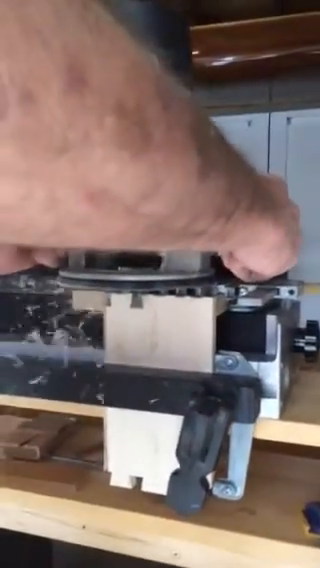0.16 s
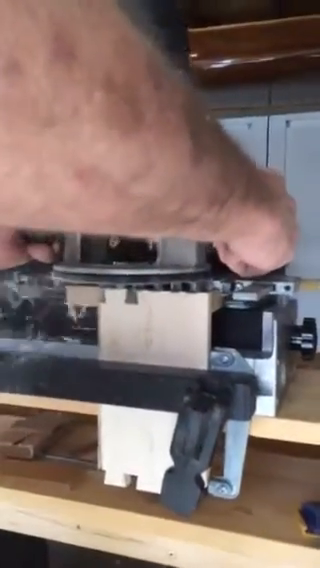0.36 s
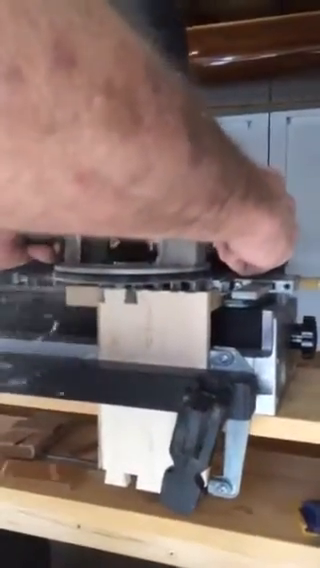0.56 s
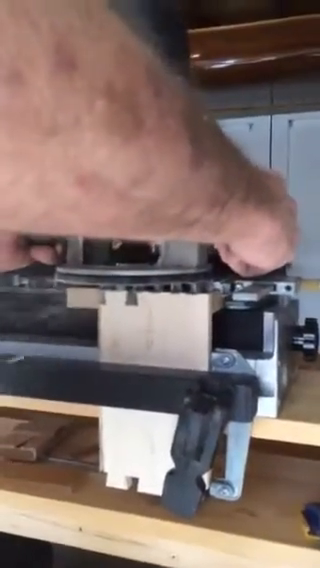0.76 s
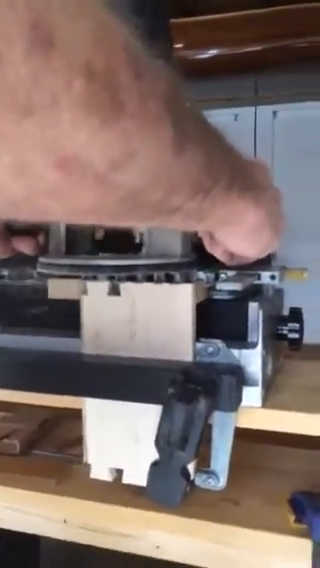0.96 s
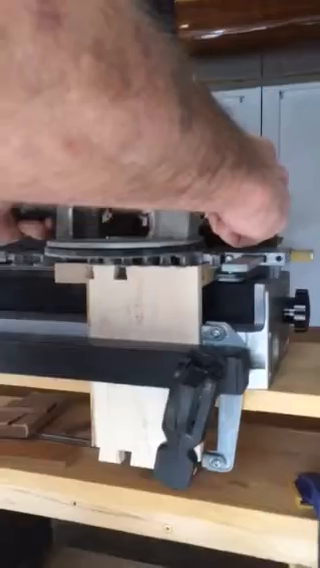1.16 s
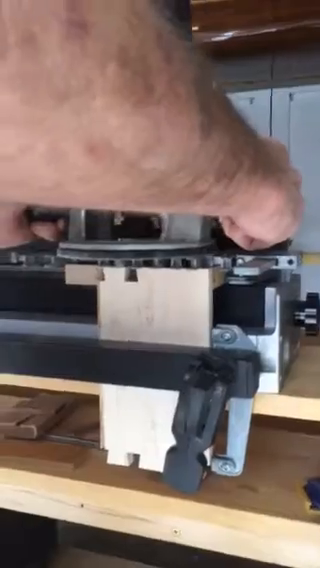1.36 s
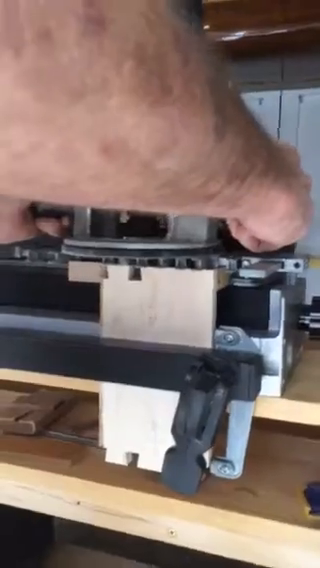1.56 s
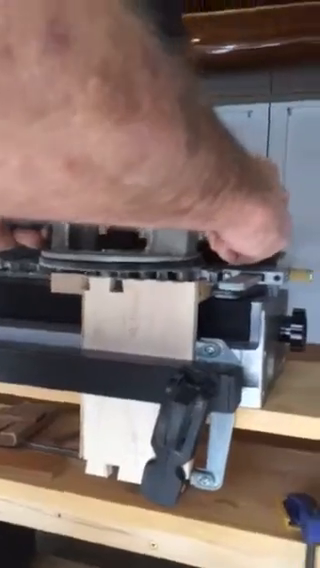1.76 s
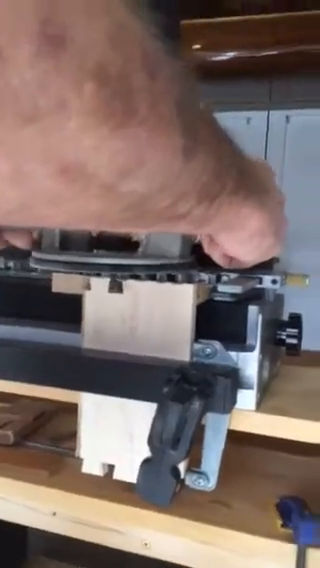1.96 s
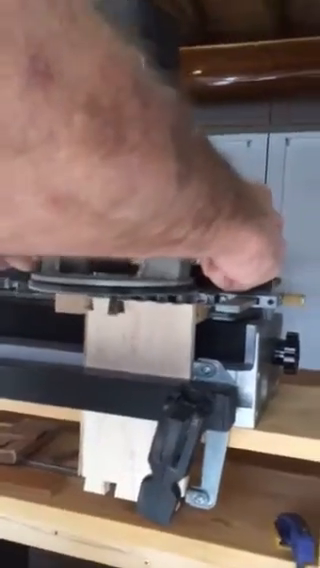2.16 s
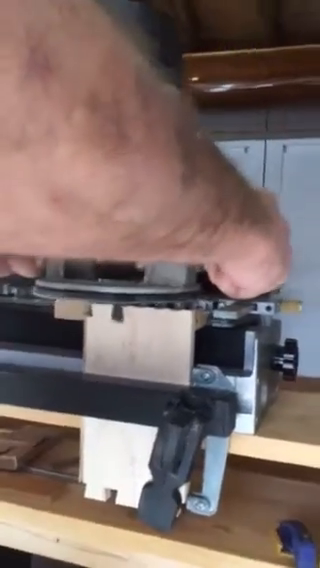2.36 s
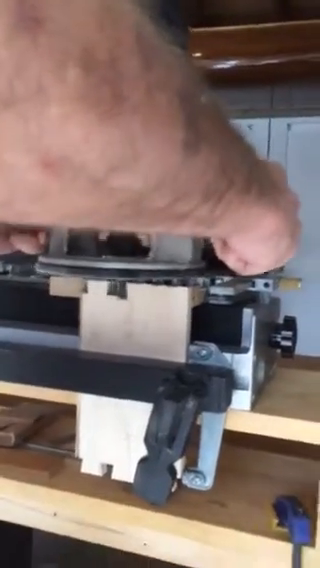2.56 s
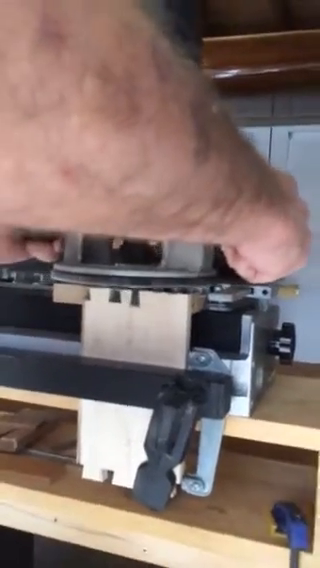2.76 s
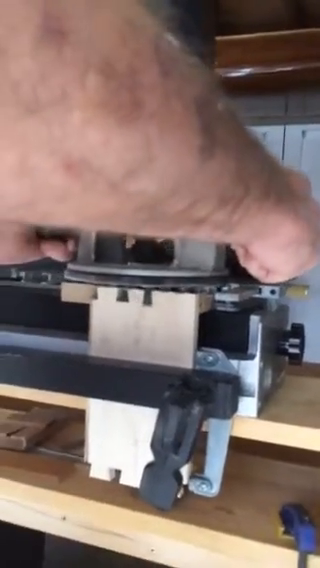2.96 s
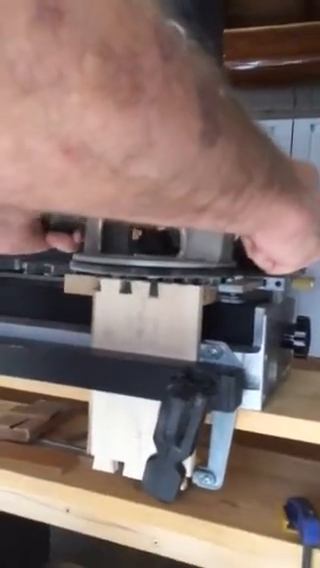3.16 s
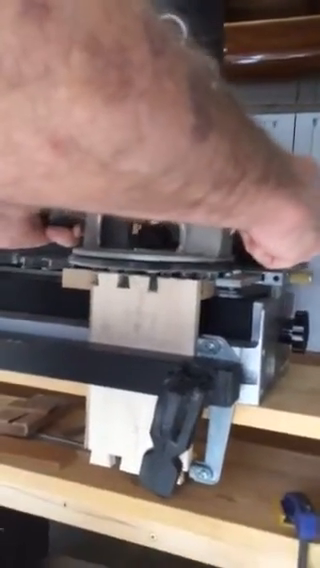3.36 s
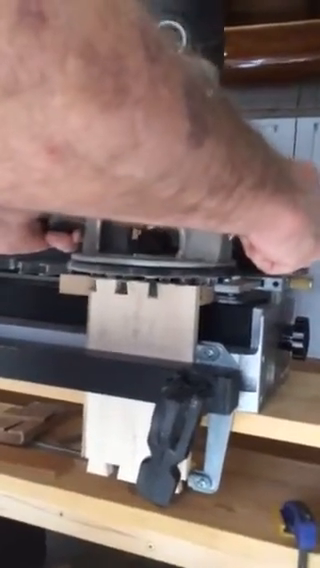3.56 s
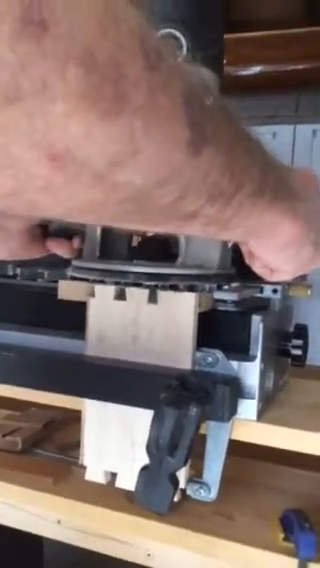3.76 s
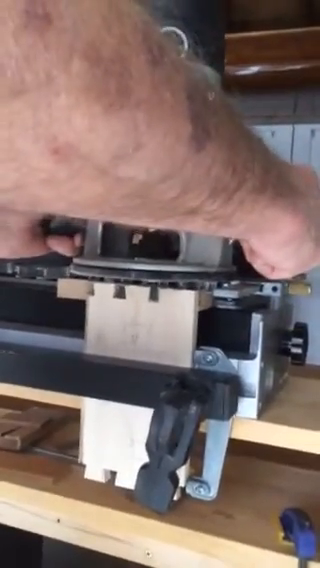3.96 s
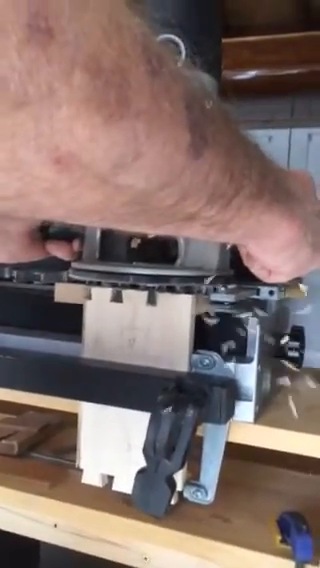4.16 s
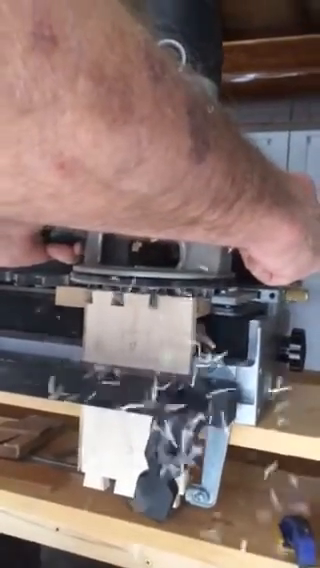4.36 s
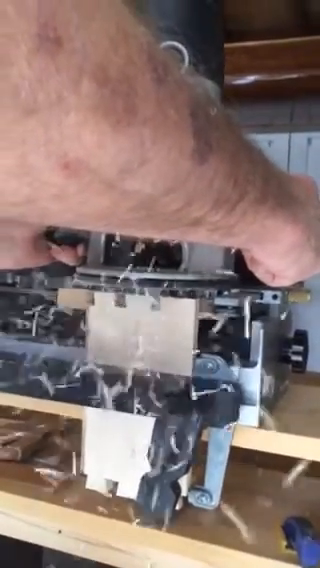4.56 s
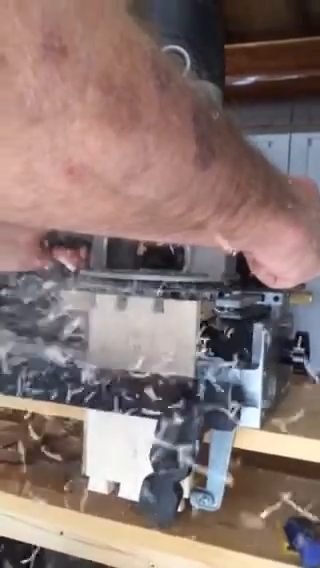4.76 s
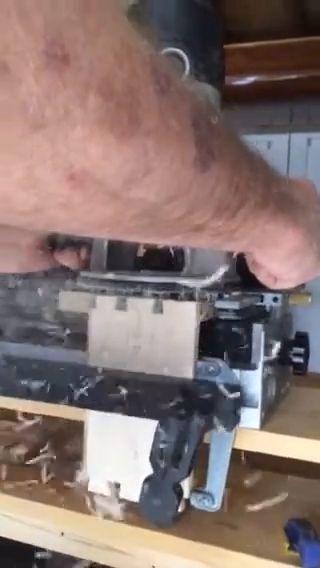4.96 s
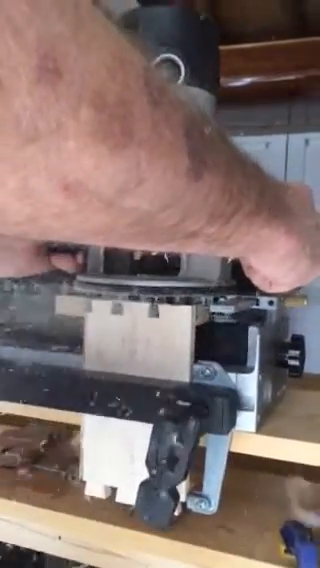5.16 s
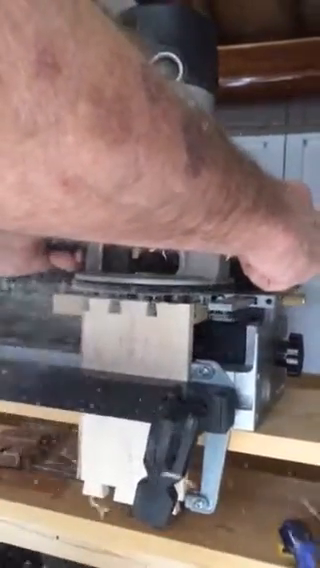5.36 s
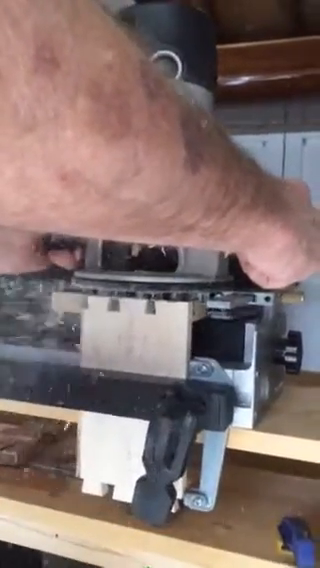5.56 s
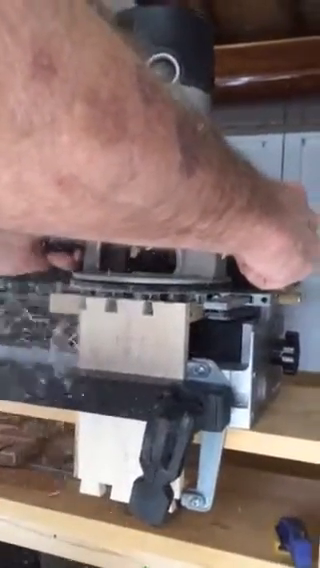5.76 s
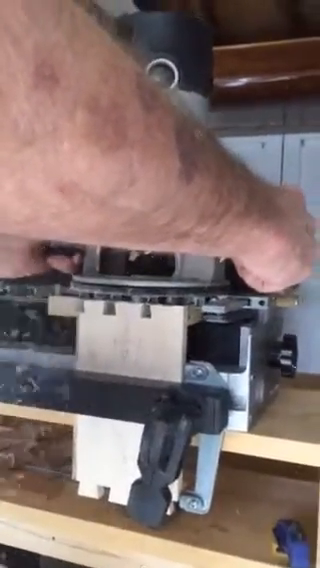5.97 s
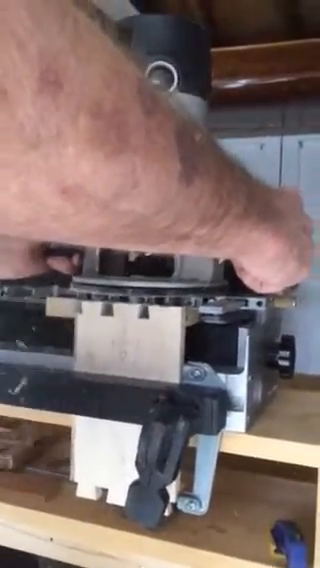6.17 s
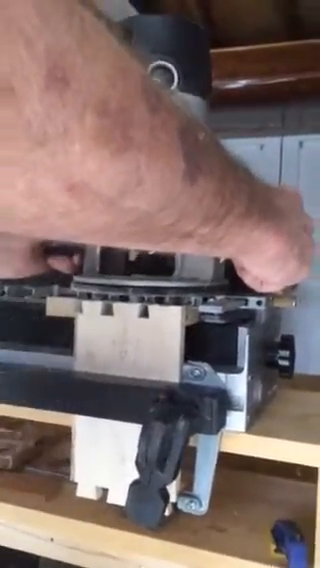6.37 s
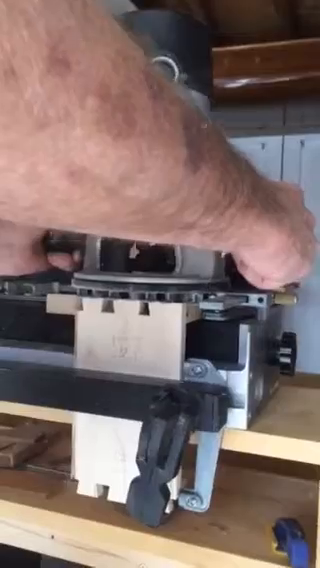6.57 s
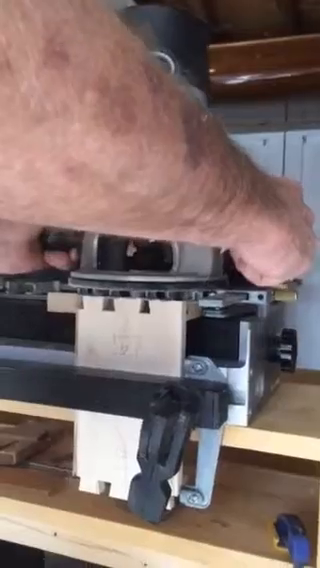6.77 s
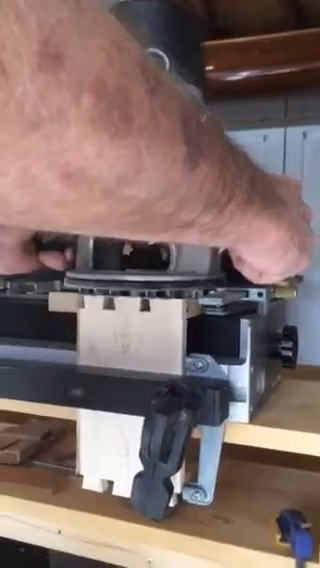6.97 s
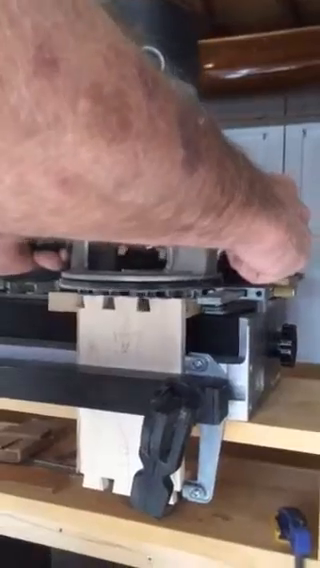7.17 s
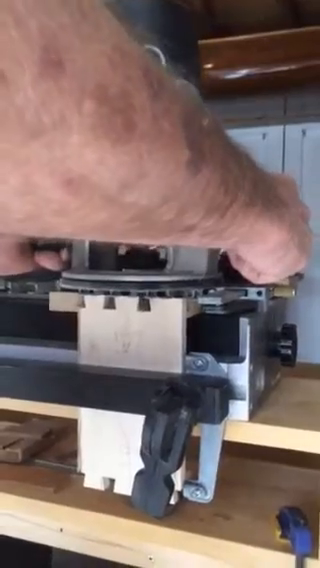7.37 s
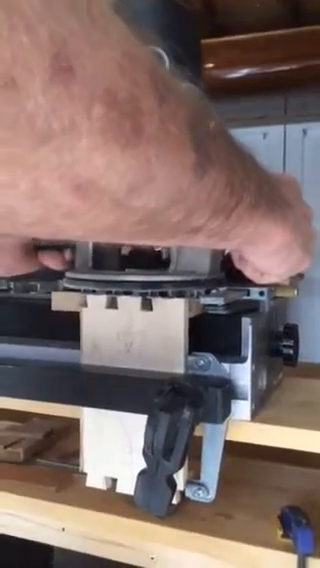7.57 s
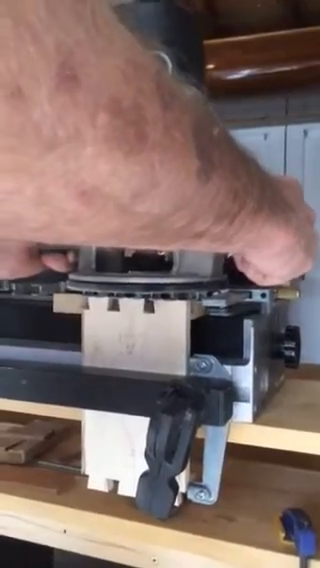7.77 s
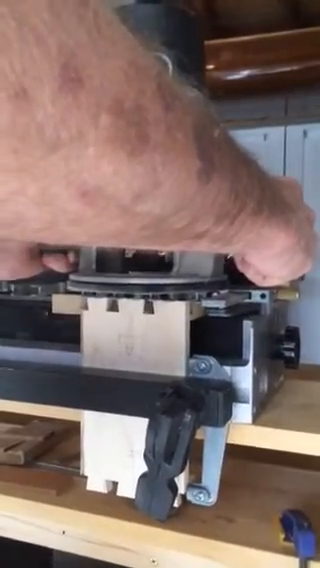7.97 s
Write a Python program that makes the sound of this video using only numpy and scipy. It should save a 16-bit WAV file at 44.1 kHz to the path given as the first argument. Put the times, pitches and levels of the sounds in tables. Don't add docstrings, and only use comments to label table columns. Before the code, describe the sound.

Loud electric router heard up close, roaring air and whistling fan without pause. It begins under light load, clears and speeds up slightly, then plunges into wood with a bright rasp that grows into metallic, shrieking chatter. The chatter stutters, breaks out with a short squeal and dull bump, and the motor climbs back to free running with faint buzzes at the end.

```python
import sys
import numpy as np
from scipy import signal
from scipy.fft import rfft, irfft
from scipy.io import wavfile
from scipy.ndimage import uniform_filter1d

SR = 44100
rng = np.random.default_rng(int(sys.argv[2]) if len(sys.argv) > 2 else 0)


def materialize(psi):
    bounded = np.clip(np.atleast_2d(psi).T, -1, 1)
    quanta = np.round(bounded * 32767).astype(np.int16)
    wavfile.write(sys.argv[1], SR, quanta)


def decibels_to_gain(level_db):
    exponent = np.asarray(level_db, float) / 20
    return 10 ** exponent


N = 353682
TIME = np.arange(N) / SR
TOP_HZ = 15290


def walk(rate):
    k = int(SR / rate)
    held = np.repeat(rng.standard_normal(N // k + 1), k)
    return 1.48 * uniform_filter1d(uniform_filter1d(held, k), k)[:N]


def line(turns, db, flicker_db, waver):
    phase = 2 * np.pi * (turns + rng.random()) + waver * walk(60)
    return np.sqrt(2) * decibels_to_gain(db + flicker_db * walk(45)) * np.sin(phase)


def curve(table):
    return np.interp(TIME, *np.transpose(table))


def dips_db(events):
    return -sum(depth_db * np.exp(-.5 * ((TIME - s) / width) ** 2) for s, depth_db, width in events)


def spells_db(rows, rest_db, fade_db_s):
    t = TIME[::64]
    held = []
    for start, end, start_db, end_db in rows:
        outside = np.maximum(np.maximum(start - t, t - end), 0)
        held.append(np.interp(t, (start, end), (start_db, end_db)) - fade_db_s * outside)
    return np.interp(TIME, t, np.maximum(np.max(held, axis=0), rest_db))


def growth_db(bite, full, release, bite_db, full_db, release_db):
    rows = [(bite, full, bite_db, full_db), (full, release, full_db, release_db)]
    return spells_db(rows, -60, 115)


def rotor_sag(load_hz):
    inertia_s, start_sag_hz = .95, 3.39
    keep = np.exp(-1 / (inertia_s * SR))
    return signal.lfilter([1 - keep], [1, -keep], load_hz, zi=[start_sag_hz])[0]


def air(turns, sag_hz, load_hz):
    stance_s = (2.07, 4.45, 6.1)
    edges_hz = (2200, 6500, 9000)
    # (frequency [Hz], density [dB per Hz])
    colour = [(15, -72), (25, -47), (183, -16.5), (289, -21.5), (482, -11), (582, -12), (848, -1),
              (1020, -3.5), (1660, -1.5), (2770, -14.5), (8130, -13.5), (13900, -18), (15500, -21)]
    # (frequency [Hz], width [Hz], level in each of the four stances [dB] x 4)
    vents = [(187, 26, -1, 8, 3, 4), (870, 160, 2.5, 3, 3, 2.5), (1168, 173, -6.5, -2, -4.5, -5.5),
             (1396, 280, 1.5, 3, 5, 4.5), (1670, 250, 2.5, 1, -1, -1), (3030, 27, 7.5, 6.5, 0, 1),
             (3330, 380, 2, 4, 2, 1.5), (4070, 120, -1.5, -3.5, -1, 0.5), (4390, 430, 1.5, 5, 5.5, 4.5),
             (4840, 440, 3.5, 2.5, 5.5, 3.5), (5520, 380, -4.5, -2.5, 2.5, -2), (6230, 400, 3, 1.5, 5, 3),
             (6700, 250, 0.5, -2, -3, -6), (7260, 500, 1.5, 2, 1, 0), (8710, 200, -10, -4.5, -1, -4),
             (9800, 720, 0.5, 1.5, 2.5, 0), (12000, 900, 0, -2, -4, -2), (13600, 800, 3, 3, 2, 2),
             (14800, 1200, 2, 1, 3, 3.5)]
    # (level of roar, rush, hiss and top hiss [dB] x 4)
    air_db = [
        (-18.5, -22.5, -25, -26),
        (-19.5, -23, -26, -25),
        (-19.5, -22, -25.5, -24.5),
        (-19.5, -22, -25.5, -24.5),
    ]
    # (change with sag [dB per 10
    # Hz], change with load [dB per 10 Hz])
    losses = [
        (-0.67, -.5),
        (-0.67, -0.09),
        (-1.07, -0.03),
        (-0.73, 0.05),
    ]
    # (time [s], width [s], band [index], level [dB])
    swells = [(1.0, .2, 1, 0.3), (1.0, .2, 2, 0), (1.0, .2, 3, 1), (1.8, 0.092, 2, 2.5), (4.5, .15, 0, 1.5),
              (4.55, .15, 1, 1), (5.7, 0.2, 0, 1.5), (5.86, .014, 1.5, 3), (5.86, .014, 2, 3),
              (5.86, .014, 3, 4)]

    hz, s, cells = signal.stft(rng.standard_normal(N), SR, nperseg=1024)
    hz = hz[:, None] + 1
    shift_s = np.repeat(stance_s, 2) + np.tile([-.06, .06], 3)
    stance = np.interp(s, shift_s, [0, 1, 1, 2, 2, 3])
    colour_hz, colour_db = np.transpose(colour)
    db = np.interp(np.log(hz), np.log(colour_hz), colour_db)
    for f, width, *lift_db in vents:
        db = db + np.interp(stance, range(4), lift_db) / (1 + (2 * (hz - f) / width) ** 2)

    sag, load = np.interp(s, TIME, sag_hz) / 10, np.interp(s, TIME, load_hz) / 10
    levels_db = [np.interp(stance, range(4), held_db) + sag_db * sag + load_db * load
                 for held_db, (sag_db, load_db) in zip(np.transpose(air_db), losses)]
    for at, width, k, puff_db in swells:
        levels_db[round(k)] += puff_db * np.exp(-.5 * ((s - at) / width) ** 2)
    band = np.searchsorted(edges_hz, hz[:, 0])
    for k, level_db in enumerate(levels_db):
        power = np.sum(decibels_to_gain(2 * db[band == k]), axis=0) / len(hz)
        db[band == k] += level_db - 10 * np.log10(power)

    patches = uniform_filter1d(rng.standard_normal(db.shape), size=7, axis=0)
    patches = uniform_filter1d(patches, size=25, axis=1)
    db = uniform_filter1d(db, size=3, axis=0) + .8 * patches / np.std(patches)
    flow = signal.istft(cells * decibels_to_gain(db), SR, nperseg=1024)[1][:N]
    return flow * decibels_to_gain(.4 * walk(12)) * (1 + .08 * np.sin(2 * np.pi * turns))


def motor(turns):
    orders = (1, 5, 11, 17)
    # (start [s], end [s], level at start [dB], level at end [dB])
    unbalance = [(0, 2.0, -45, -45), (.8, 1.32, -39, -36), (2.0, 2.9, -41, -40), (2.9, 4.76, -44, -40),
                 (5.04, 6.01, -36, -35), (6.26, 7.03, -35, -36)]
    buzz = [(.24, .52, -30.5, -32.5), (.87, 1.5, -32.5, -33), (1.5, 4.3, -38.5, -39),
            (4.48, 4.798, -32, -31), (5.92, 6.9, -30, -39)]
    slots = [(0.152, .38, -39, -34), (.62, 1.3, -37, -36), (1.86, 1.95, -35, -36), (3.3, 3.902, -41, -39),
             (4.3, 4.55, -37, -35), (5.85, 6.16, -35, -31), (6.85, 6.93, -35, -33), (7.2, 7.5, -38, -35),
             (7.7, 8.02, -41, -35)]
    # unbalance, buzz, slots between spells (level [dB])
    resting_db = (-52, -49, -46)
    # (time [s], level [dB])
    fan = [(0, -26), (.3, -31), (.5, -32), (.75, -24.5), (1.1, -26.5), (1.65, -26.5), (1.9, -23.5),
           (2.15, -23.5), (2.45, -34), (2.65, -41), (3.0, -28), (3.9, -23), (4.35, -27), (5.3, -32.5),
           (6.15, -34.5), (6.65, -31), (7.0, -24), (8.02, -28)]

    fade_db_s = 110
    levels_db = [spells_db(rows, db, fade_db_s) for rows, db in zip((unbalance, buzz, slots), resting_db)]
    levels_db.append(curve(fan))
    return sum(line(k * turns, db + 1.2, .9, .06) for k, db in zip(orders, levels_db))


def cut(turns, shaft_hz):
    # (shaft multiple, part [0 strike 1 board 2 clamp 3 template 4 collet 5 fence], level [dB],
    #  favouring resonance [Hz])
    orders = [(2, 0, 0, 950), (3, 0, -6, 1470), (4, 1, 1, 1900), (6, 5, -2, 2830), (7, 2, 1, 3290),
              (8, 5, -4, 3750), (9, 3, -3, 4150), (10, 3, 2, 4770), (12, 4, 0, 5520)]
    # (start [s], end [s], level at start [dB], level at end [dB])
    strike = [(0, .5, -34, -35), (.85, 1.15, -37, -36.5), (4.27, 4.93, -20.5, -24.5), (4.92, 5.5, -27, -35),
              (5.5, 6.07, -30.5, -35), (6.6, 7.15, -33.5, -34.5)]
    board = [(0, .4, -35.5, -29.5), (.4, 1.28, -32.5, -29), (1.5, 2.3, -38, -40), (2.6, 3.5, -40, -40),
             (4.25, 4.55, -28, -34), (4.8, 5.15, -39, -40), (5.85, 5.93, -32, -30), (7.95, 8.02, -33, -33)]
    clamp = [(0, .55, -39, -32), (.55, 1.15, -31.5, -41), (4.3, 4.55, -37, -28), (4.6, 5.8, -41, -39),
             (5.86, 6.0, -32, -31), (6.06, 6.14, -30, -28), (6.855, 6.932, -28.5, -29)]
    template = [(.05, .7, -39, -36), (.75, 1.28, -34.5, -35.5), (1.86, 1.98, -33, -36),
                (4.4, 4.74, -35, -40), (5.4, 5.85, -41, -38), (5.87, 6.02, -34, -38),
                (6.855, 6.935, -36, -37), (7.95, 8.02, -44, -37)]
    collet = [(.17, .33, -31, -31), (4.3, 4.62, -29, -28), (5.45, 5.85, -40, -32), (5.868, 5.95, -32, -35),
              (6.02, 6.13, -27, -30), (6.855, 6.935, -36, -36)]
    fence = [(.05, 1.15, -34, -37), (4.3, 4.6, -36, -31), (4.598, 5.8, -39, -38.5), (5.85, 6.08, -28, -29)]
    # (time [s], depth [dB], width [s])
    ease = [
        (4.46, 6, .025),
        (4.71, 4.5, .03),
        (6.03, 5, .03),
    ]

    clear_db = (-43, -53, -50, -52, -52, -42)
    fade_db_s = 400
    parts = zip((strike, board, clamp, template, collet, fence), clear_db)
    levels_db = np.array([spells_db(rows, db, fade_db_s) for rows, db in parts]) + dips_db(ease) + 1.5
    sound = np.zeros(N)
    for k, part, db, resonance_hz in orders:
        detune_db = -6.5 * np.minimum(((k * shaft_hz - resonance_hz) / 230) ** 2, 1)
        sound += line(k * turns, levels_db[part] + db + detune_db, 1.3, .1)
    return sound


def tearing(low_hz, high_hz):
    band = signal.butter(2, (low_hz, high_hz), "band", fs=SR, output="sos")
    rip = signal.sosfilt(band, rng.standard_normal(N))
    return rip / np.std(rip)


def chatter(turns):
    # (time [s], frequency [Hz])
    bending = [(4.6, 3137), (4.7, 3126), (4.9, 3119), (5.2, 3093), (5.42, 3083.5), (5.57, 3091),
               (5.73, 3108.5), (5.8, 3108), (5.88, 3092)]
    # (bites [s], full [s], lets go [s], level at bite [dB], full level [dB], level at letting go [dB])
    growth = [
        (4.62, 4.9, 5.8, -35, -25.5, -29.5),
        (4.64, 5.3, 5.8, -26.5, -22.5, -27.5),
        (4.657, 4.88, 5.83, -19, -12.5, -25),
    ]
    # (shaft multiple, group [0 mode 1 lower 2 upper], level [dB])
    sidebands = [(-2, 0, -12), (0, 0, 0), (1, 1, -6), (2, 1, -3), (3, 1, -3), (4, 2, -2), (5, 2, -4),
                 (6, 0, -3)]
    # (shaft multiple, level [dB])
    lift_off = [(4, -7), (5, -10), (6, -4), (7, -5), (8, -8), (9, -14)]
    # (time [s], depth [dB], width [s])
    stutter = [(4.74, 5, .006), (4.83, 4, .006), (5.475, 4, .008), (5.505, 7, .011), (5.55, 7, .009),
               (5.59, 8, .007), (5.638, 16, .01), (5.697, 20, .011), (5.75, 5, .008), (5.768, 9, .006),
               (5.82, 6, .009)]
    # (low [Hz], high [Hz], level relative to upper sidebands [dB])
    tear = (4300, 6100, -13)
    # (time [s], frequency [Hz])
    entry_mode = [(4.45, 3281), (4.55, 3275), (4.72, 3258), (4.98, 3219), (5.06, 3200)]
    entry_growth = [
        (4.5, 4.76, 4.98, -33, -24, -38),
        (4.45, 4.59, 4.9, -30, -25.5, -42),
    ]
    # (shaft multiple, group [0 mode 1 upper], level [dB])
    entry_sidebands = [(-1, 0, -6), (0, 0, 0), (1, 0, -7), (3, 1, -3), (4, 1, 0)]

    levels_db = [growth_db(*row) for row in growth]
    swings = np.cumsum(curve(bending)) / SR + .015 * walk(40)
    shallow = np.clip((5.3 - TIME) / .3, 0, 1)
    slack = np.clip((TIME - 5.6) / .12, 0, 1)
    grip_db = dips_db(stutter) + .5 * walk(50) + 3 * (TIME > 5.46)
    once = np.zeros(N)
    for k, group, db in sidebands:
        lean_db = (group == 1) * shallow * (4 * k - 10) - 7 * (k == 5) * slack
        once += line(swings + k * turns, levels_db[group] + db + lean_db, .9, .08)
    twice = sum(line(2 * swings + k * turns, levels_db[1] + db, 1.3, .12) for k, db in lift_off)
    low_hz, high_hz, tear_db = tear
    torn = decibels_to_gain(levels_db[2] + tear_db) * tearing(low_hz, high_hz)

    entry_swings = np.cumsum(curve(entry_mode)) / SR
    entry_db = [growth_db(*row) for row in entry_growth]
    entry = sum(line(entry_swings + k * turns, entry_db[group] + db, 1.5, 0.16)
                for k, group, db in entry_sidebands)
    return decibels_to_gain(grip_db) * (once + torn + decibels_to_gain(-3.5) * twice) + entry


def break_out(turns):
    # (shaft multiple, level [dB])
    squeal_lines = [(20, -36), (24, -29), (25, -38), (26, -28), (28, -36), (30, -36), (32, -30)]
    # (start [s], end [s])
    squeal_s = (5.745, 5.865)
    # (time [s], frequency [Hz], peak level [dB], decay time t60 [s])
    knock = (5.836, 85, -25.5, .06)

    start, end = squeal_s
    swell = np.clip(np.minimum(TIME - start, 2 * (end - TIME)) / .05, 0, 1)
    squeal = swell * sum(line(k * turns, db, 3, .25) for k, db in squeal_lines)
    s, hz, peak_db, t60 = knock
    age = np.clip(TIME - s, 0, None)
    return squeal + decibels_to_gain(peak_db) * np.sin(2 * np.pi * hz * age) * 1000. ** (-age / t60)


def scene():
    # (time [s], sag [Hz])
    load_course = [(0, 5.7), (.4, 19.1), (.93, 21.8), (1.08, 6.8), (1.25, 0), (4.15, 0), (4.29, 28.2),
                   (4.62, 43.6), (5.05, 49.7), (5.42, 42.8), (5.69, 30.5), (5.86, 32.9), (6.08, 0),
                   (7.8, 0), (8.02, 4.5)]
    free_hz = 487.76
    load_hz = curve(load_course)
    sag_hz = rotor_sag(load_hz)
    shaft_hz = free_hz - sag_hz
    turns = np.cumsum(shaft_hz) / SR
    sound = air(turns, sag_hz, load_hz) + motor(turns) + cut(turns, shaft_hz)
    sound = sound + chatter(turns) + break_out(turns)
    return np.array([sound, sound])


def drop_weak_cells(x):
    mask_db, mask_top_db, from_hz = -5.6, 2.1, 4300
    frame = dict(fs=SR, window="cosine", nperseg=2048)
    hz, _, cells = signal.stft(x, **frame)
    hz = hz[:, None]
    power = uniform_filter1d(np.abs(cells) ** 2, size=2, axis=1)
    narrow_db = 10 * np.log10(uniform_filter1d(power, size=6, axis=0) + 1e-18)
    threshold_db = uniform_filter1d(narrow_db, size=61, axis=0) + mask_db + mask_top_db * (hz / TOP_HZ) ** 2
    return signal.istft(cells * ((narrow_db > threshold_db) | (hz < from_hz)), **frame)[1][:N]


def treble_flecks():
    count, band_hz, level_db = 42, 1400, -31.
    out, hz = np.zeros(N + 2048), np.fft.rfftfreq(2048, 1 / SR)
    window = np.sin(np.pi * np.arange(2048) / 2048)
    for at, pitch in rng.random((count, 2)):
        low_hz = 4200 + 8800 * pitch ** 1.3
        inside = (hz > low_hz) * (hz < low_hz + band_hz)
        burst = irfft(rfft(rng.standard_normal(2048)) * inside)
        start = int(at * N / 1024) * 1024 + 88
        out[start:start + 2048] += burst / np.std(burst) * window * decibels_to_gain(level_db - 5 * pitch)
    return out[:N]


def band_limit(x):
    return signal.sosfilt(signal.butter(12, 15790, fs=SR, output="sos"), x)


def record(dry):
    thin = signal.sosfilt(signal.butter(3, 50, "high", fs=SR, output="sos"), dry[0])
    audible = drop_weak_cells(np.tanh(thin))
    dull = signal.sosfilt(signal.ellip(12, .3, 60, TOP_HZ, fs=SR, output="sos"), audible)
    mix = dull + np.outer([1, -1], treble_flecks())
    return band_limit(mix)


dry = scene()
out = record(dry)
materialize(out)
```